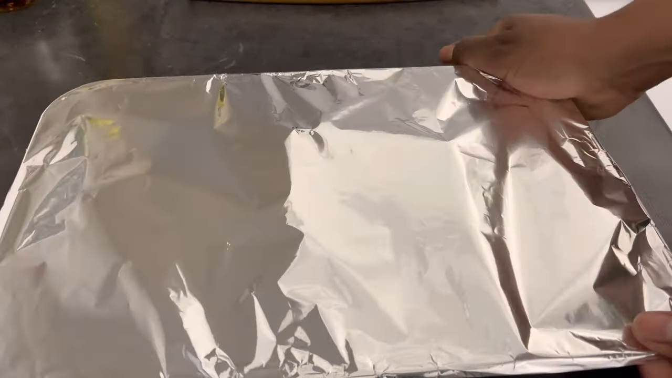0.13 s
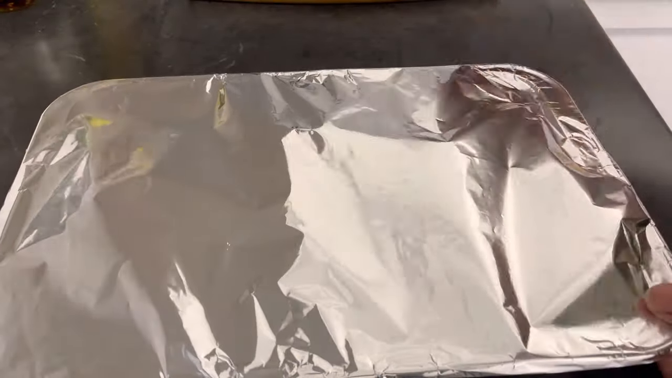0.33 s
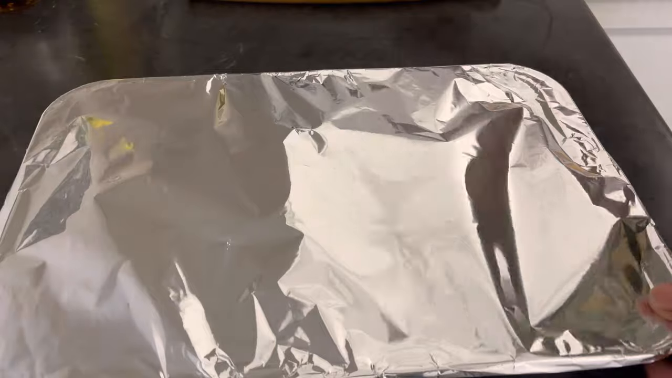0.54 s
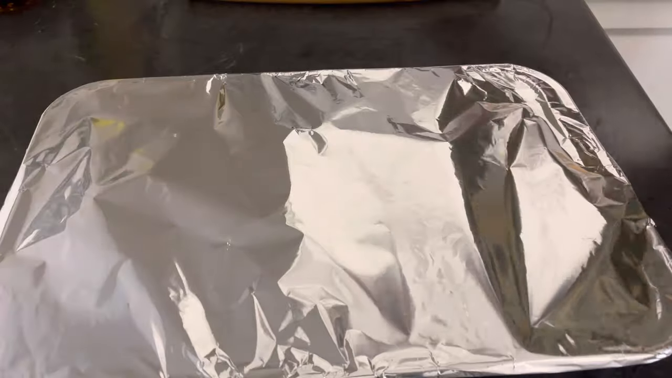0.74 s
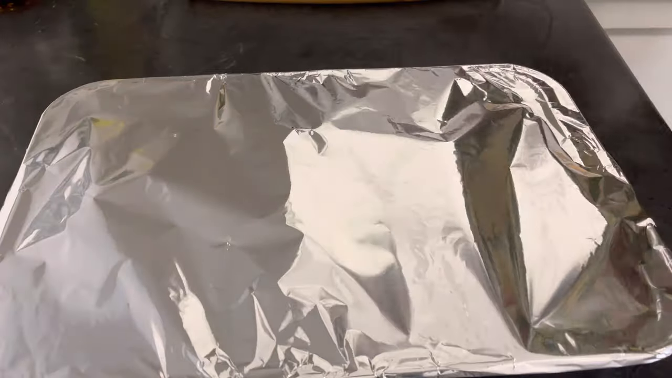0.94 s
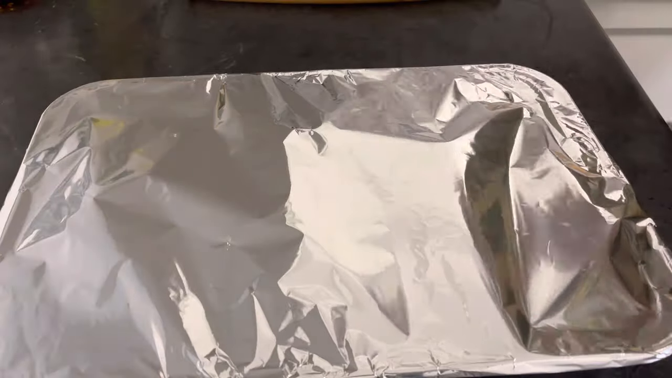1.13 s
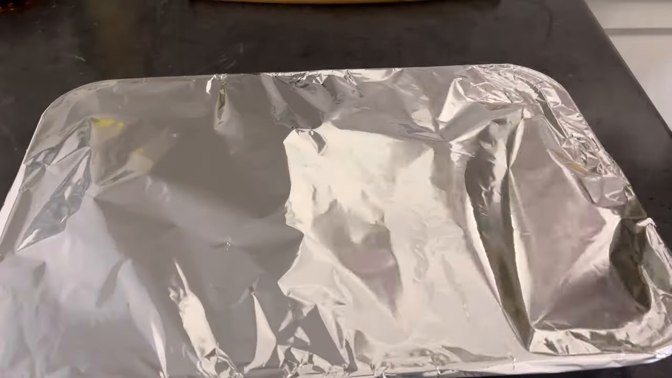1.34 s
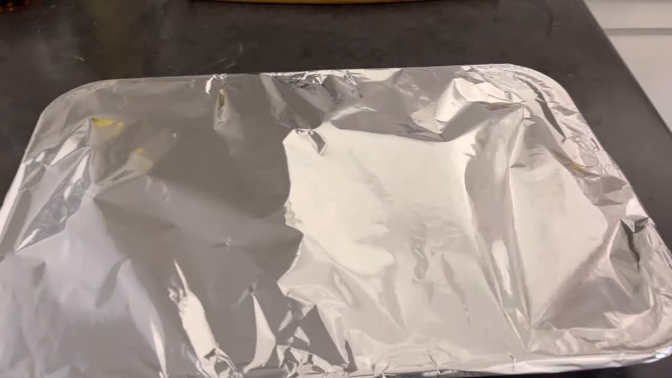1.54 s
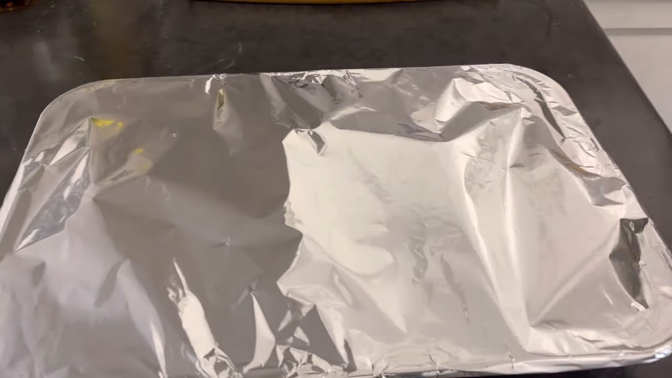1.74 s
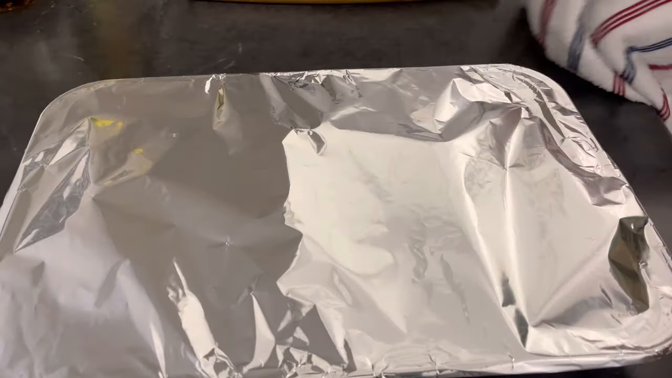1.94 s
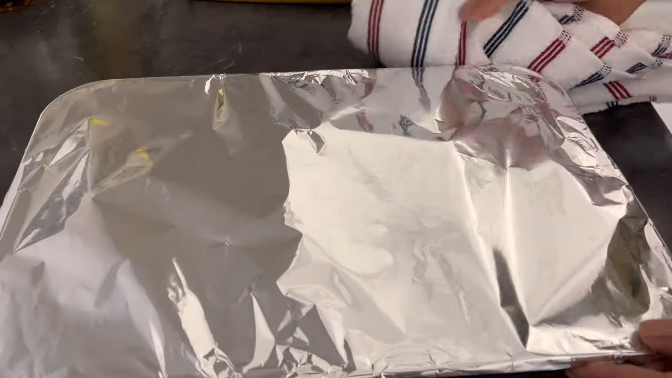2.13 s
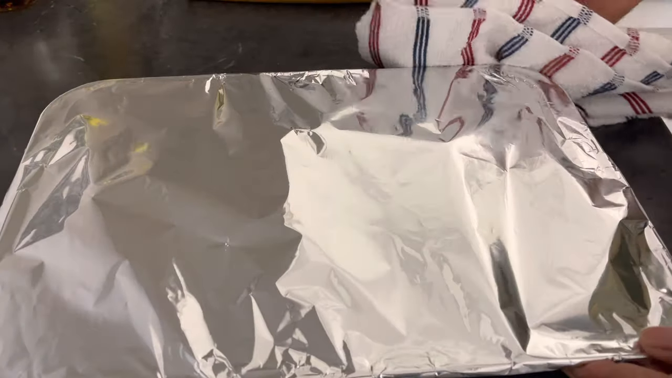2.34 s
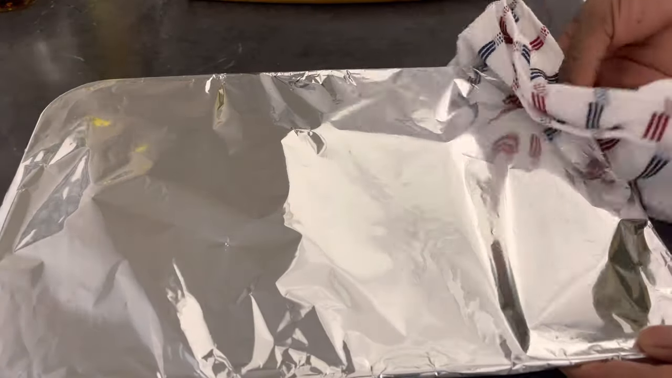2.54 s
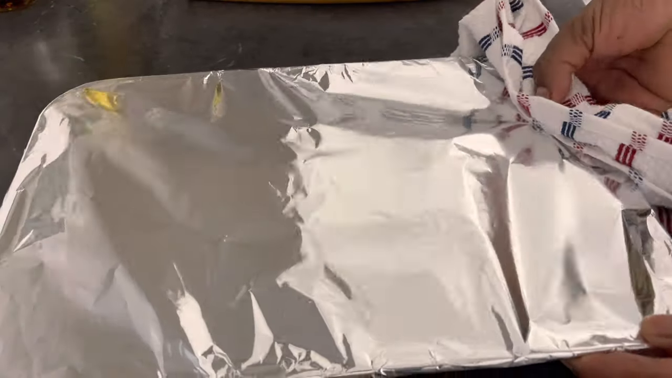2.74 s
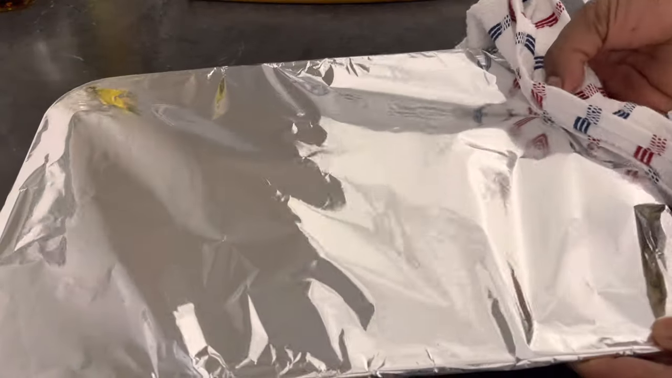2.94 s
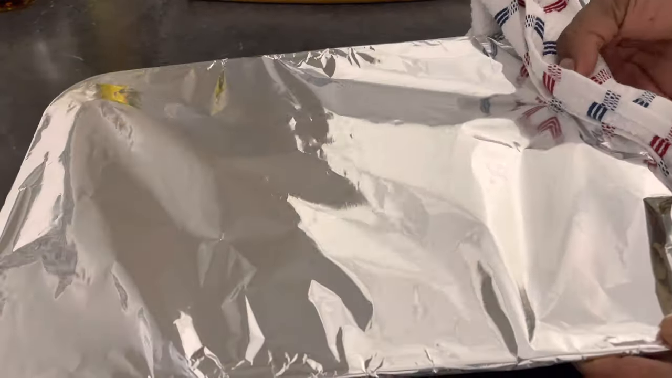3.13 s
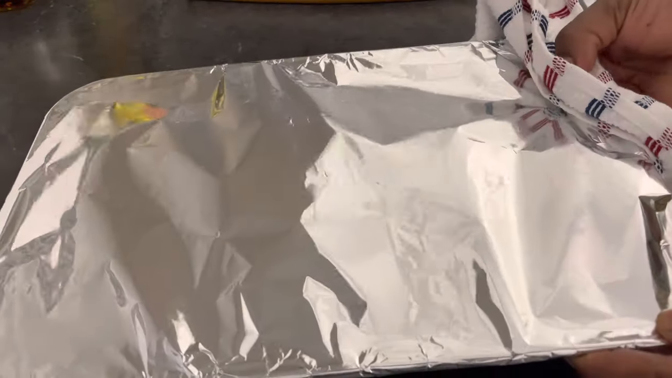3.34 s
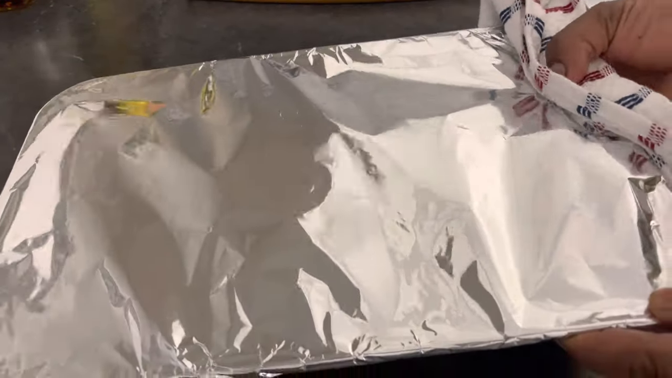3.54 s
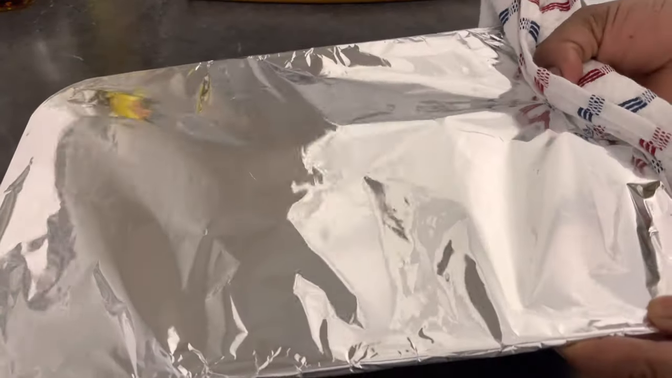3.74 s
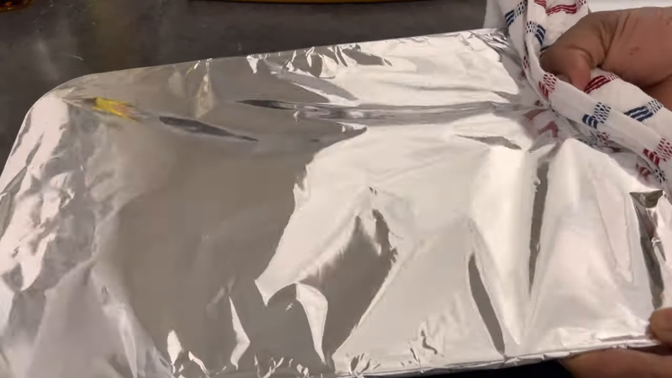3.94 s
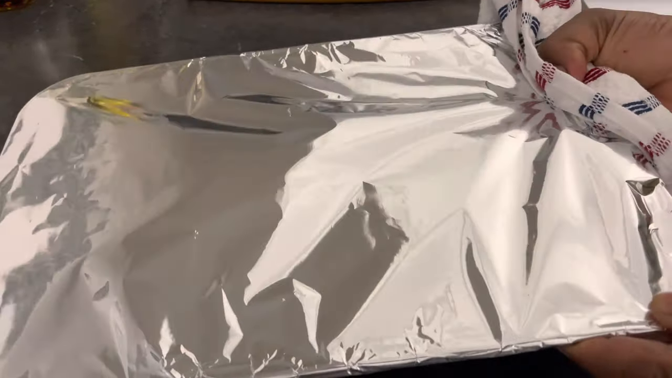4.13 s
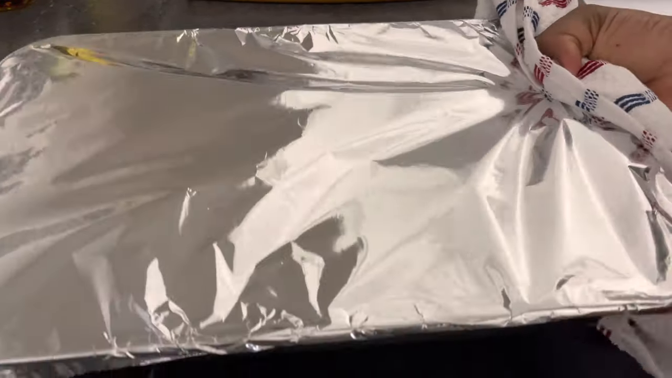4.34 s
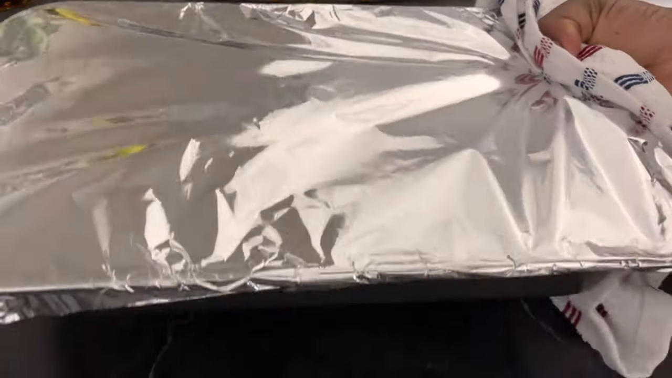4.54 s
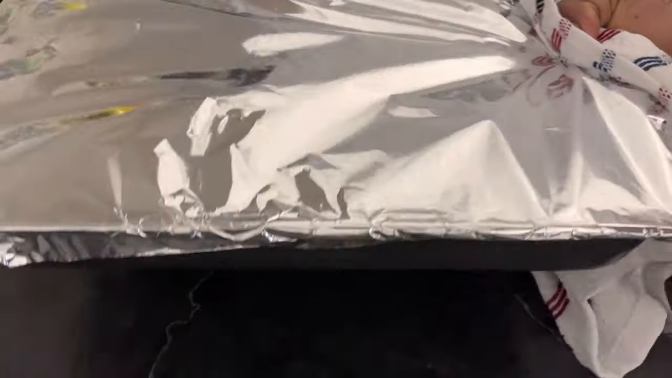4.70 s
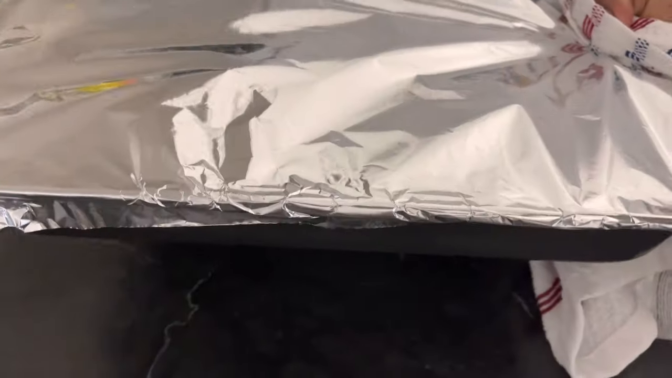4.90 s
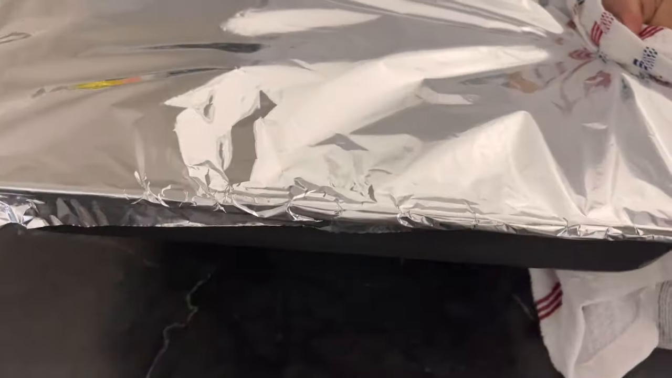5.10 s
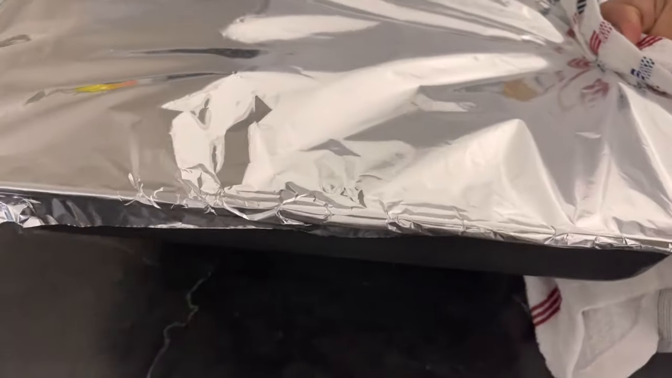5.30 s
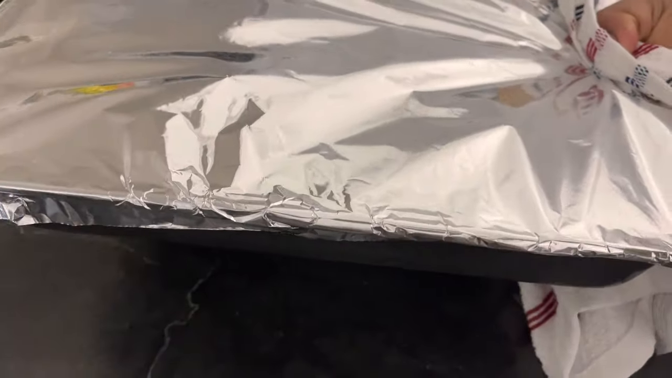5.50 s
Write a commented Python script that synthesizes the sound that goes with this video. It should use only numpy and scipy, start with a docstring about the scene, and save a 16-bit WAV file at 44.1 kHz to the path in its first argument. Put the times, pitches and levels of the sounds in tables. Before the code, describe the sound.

A close stereo sound of aluminium foil on a baking pan in a small kitchen with a short diffuse tail. From 0 to 0.6 s the foil is pressed in brief crisp crackles, with a soft low pan thud at the start and a stronger cluster of dull knocks around 0.35 s. The crackle then falls away; from about 0.9 to 2.1 s there is mostly soft low fridge hum and room air, a very faint high fizz near 1 s, and a tiny tick at 1.3 s. At 2.15 s crinkling resumes, swelling at 2.65 s. A sharp, loud snap and pan knock strike at 3.2 s. Dense, bright crumpling with brief pitched pops continues, strongest around 3.65-4.35 s, with a piercing snap near 3.93 s. After 4.5 s it thins to scattered small creases, with faint ticks at 5.15, 5.5 and 5.64 s over the hum.

```python
"""Foil crimped round a baking pan

In a kitchen, aluminium foil is pressed round the rim of a baking pan, close to a pair of microphone ports.
Random snaps, thousands a second, ring the sheet crisp and dull; creases open with a snap and crackle on.
Buckling facets ring as short pitched pops, and knocks on the worktop ring the modes of the pan.
A short diffuse tail follows; behind lie filtered-noise room air and fizz, a fridge hum and fuzzy tones."""
import sys
import numpy as np
from scipy import signal
from scipy.fft import rfft, irfft
from scipy.io import wavfile
from scipy.ndimage import uniform_filter1d

SR = 44100
rng = np.random.default_rng(int(sys.argv[2]) if len(sys.argv) > 2 else 0)


def wav_record(signal):
    """Record a signal, one row per channel, as 16-bit PCM in the file named by sys.argv[1]."""
    frames = np.transpose(np.atleast_2d(signal))
    bounded = np.clip(frames, -1, 1)
    # unit amplitude maps onto the largest positive 16-bit level
    quanta = np.round(bounded * 32767).astype(np.int16)
    wavfile.write(sys.argv[1], SR, quanta)


N = 249604
T = np.arange(N) / SR


def gain_of(db):
    """Decibels to amplitude."""
    return 10 ** (np.asarray(db) / 20)


def evened(x):
    """Scales to rms 1."""
    return x / np.sqrt(np.mean(x ** 2) + 1e-20)


def over_time(points):
    """Follows a (start_s, level_db) table in straight lines through the scene."""
    return np.interp(T, *np.transpose(points))


def read(points, hz):
    """Every column of a frequency table at the given frequencies, interpolated along log frequency."""
    f, *columns = np.transpose(points)
    return [np.interp(np.log(hz + 1), np.log(f + 1), c) for c in columns]


def coloured(x, points):
    """Filters by a (freq_hz, level_db) table, scaled so that white noise keeps its overall level."""
    gain = gain_of(read(points, np.fft.rfftfreq(x.shape[-1], 1 / SR))[0])
    return irfft(rfft(x) * evened(gain), x.shape[-1])


def drift(cutoff_hz):
    """Random wavering of rms 1: noise kept below the cutoff."""
    return evened(signal.lfilter(*signal.butter(2, cutoff_hz, fs=SR), rng.standard_normal(N)))


def rings(decays, count, size, colour_db=0.):
    """Dense noise rings that die at a speed set for each frequency, unevenly coloured; mean energy 1."""
    frames = dict(nperseg=64, noverlap=48)
    hz, t, z = signal.stft(rng.standard_normal((count, size)), SR, **frames)
    colour = colour_db * evened(uniform_filter1d(rng.standard_normal((count, len(hz), 1)), size=3, axis=1))
    colour -= 10 * np.log10(np.mean(gain_of(2 * colour), axis=0))  # together the rings stay flat
    t60 = read(decays, hz)[0][:, None]
    ring = signal.istft(z * gain_of(colour - 60 * t / t60), SR, **frames)[1]
    return evened(ring) / np.sqrt(ring.shape[1])


# Squeezes of the fingers: start_s (of most force), level_db (crisp crackle), swell_s, hold_s, fade_s
SQUEEZES = [(0.0, -29, .05, 0.0029, 0.071), (0.199, -34, 0.26, .005, 0.073),
            (0.334, -30.5, 0.02, 0.017, 0.061), (0.409, -40.5, .08, .02, 0.089),
            (0.568, -40.5, 0.09, 0.04, 0.047), (0.836, -66, .04, 0.046, 0.12),
            (2.167, -34, 0.056, .005, 0.15), (2.326, -38.5, 0.035, 0.38, 0.16),
            (2.648, -21, 0.022, 0.088, 0.13), (2.803, -33.5, 0.046, .05, 0.11),
            (3.008, -40.5, 0.095, 0.033, 0.18), (3.175, -27, 0.062, 0.0067, 0.025),
            (3.219, -21, 0.0097, 0.01, 0.14), (3.381, -27, 0.099, .01, 0.077),
            (3.435, -28, .05, 0.0075, 0.073), (3.502, -33, 0.072, 0.035, .1),
            (3.59, -32.5, 0.22, .005, 0.094), (3.659, -28, 0.037, 0.064, 0.086),
            (3.799, -23.5, 0.019, .002, 0.048), (3.876, -25, 0.11, 0.044, 0.048),
            (3.932, -19.5, 0.00485, 0.018, 0.06), (4.084, -26, 0.063, 0.0046, 0.1),
            (4.158, -25.5, 0.01, 0.11, 0.048), (4.311, -24, 0.045, 0.0038, 0.039),
            (4.348, -31.5, .005, 0.0056, 0.19), (4.554, -47, 0.063, .005, 0.12),
            (4.617, -42, 0.029, .005, 0.13), (5.158, -56.5, .035, .005, 0.14),
            (5.637, -63.5, .02, .002, .02)]
# The sheet ticking on between squeezes: start_s, level_db
SETTLING_TICKS = [(0.6, -51), (0.85, -70.5), (1.2, -84.5), (1.95, -67), (2.07, -83), (2.1, -56), (2.2, -70),
                  (4.5, -57.5), (4.8, -62), (5.05, -91.5), (5.66, -94)]
SWING_DB = 20  # change of a squeeze over one swell or fade time
RATTLE_DB, RATTLE_SLOPE = -38, 0.8  # dull rattle at a crackle of -30 dB; dB gained per dB of crackle
CLUMP_DB, CALM_DB = 3.0, -71  # scale of the clumping; crackle level below which there is none


def squeezes():
    """Power of the crisp and dull crackle: force sets both, the rattle growing less steeply than the crackle."""
    crisp = gain_of(2 * over_time(SETTLING_TICKS))
    for start_s, level_db, swell_s, hold_s, fade_s in SQUEEZES:
        before = np.clip((start_s - T) / swell_s, 0, 5)
        after = np.clip((T - start_s - hold_s) / fade_s, 0, 5)
        crisp = crisp + gain_of(2 * (level_db - SWING_DB * (before + after)))
    crisp_db = 10 * np.log10(crisp)
    shared = drift(50.4)
    own = np.array([drift(100.0), drift(37.0)])
    clumping = CLUMP_DB * np.clip((crisp_db - CALM_DB) / 20, 0, 1)  # full from 20 dB above calm
    dull_db = RATTLE_DB + RATTLE_SLOPE * (crisp_db + 30)
    return gain_of(2 * (clumping * (0.79 * shared + 0.45 * own) + [crisp_db, dull_db]))


# Single large creases: start_s, level_db (crisp burst), rattle_db (dull burst relative to it)
LARGE_CREASES = [(0.01, -28.5, -5), (0.1349, -37, -2), (0.1748, -27.5, -4), (0.3016, -33.5, -1.5),
                 (0.3334, -24, -17), (0.35, -26, -13), (0.4307, -28, -6.5), (0.532, -35.5, -5),
                 (0.5747, -29, -5), (1.309, -53, -19), (2.159, -21, -8), (2.302, -26.5, -9),
                 (2.336, -22, -14), (2.392, -42, 9), (2.41, -40, 9.5), (2.4495, -26, -6.5),
                 (2.519, -26.5, -10), (2.6, -24.5, -8), (2.6444, -16, -5.5), (2.6575, -15.5, -11),
                 (2.715, -18, -8), (2.729, -17, -13.5), (2.9076, -33, -6), (2.9986, -17, -11),
                 (3.079, -24.5, -13), (3.107, -24, -12), (3.218, -8.5, -12), (3.5518, -26, -4),
                 (3.588, -23.5, -14), (3.6527, -15, -12), (3.6718, -19, -14), (3.714, -21, -11.5),
                 (3.7846, -13, -14), (3.848, -21, -10), (3.8788, -21, -13.5), (3.905, -13, -15),
                 (3.9283, -12.5, -21), (4.037, -19.5, -11.5), (4.067, -19.5, -16), (4.16, -16.5, -25),
                 (4.2026, -15, -17.5), (4.3145, -18.5, -16), (4.3545, -17, -13.5), (4.5326, -26.5, -10),
                 (4.541, -28, -6), (4.611, -31, -5.5), (4.69, -40, -3), (4.7814, -30.5, -9),
                 (4.886, -47.5, -12), (5.1318, -43.5, -4.5), (5.147, -33, -7.5), (5.2487, -53, 6.5),
                 (5.3125, -65.5, 14.5), (5.468, -60, 9.5), (5.493, -56.5, 7), (5.6362, -42, 9)]
FIRST_SNAP_DB = 11  # the snap that opens a crease, over the burst that follows
BURST_T60_S, BURST_S_PER_DB = 0.04, 0.0029  # t60 after a crease of -30 dB; longer for larger creases


def creases(power):
    """Adds a dying burst of small snaps to the power at each crease; returns the opening snaps."""
    first = np.zeros((2, N))
    for start_s, level_db, rattle_db in LARGE_CREASES:
        start = round(start_s * SR)
        level = gain_of(level_db + np.array([0, rattle_db]))
        t60 = max(BURST_T60_S + BURST_S_PER_DB * (level_db + 30), .01)
        burst = gain_of(-2 * 60 * T[:8192] / t60)
        part = power[:, start:][:, :len(burst)]  # a view, so power itself grows
        part += level[:, None] ** 2 * burst[:part.shape[1]]
        first[:, start] = level * gain_of(FIRST_SNAP_DB)
    return first


# Tone of the crisp crackle: freq_hz, level_db (per Hz)
CRISP_TONE = [(2500, -27), (5000, -9), (7000, -10), (8600, -5.5), (10300, 3), (11700, 2.5), (12500, -6),
              (13500, -33), (15600, -32.5), (16000, -57.5)]
# Tone of the duller sheet rattle: freq_hz, level_db (per Hz)
RATTLE_TONE = [(250, -20.5), (600, -13), (1300, -4.5), (2000, 0.5), (2700, 2.5), (3500, 0), (5000, -5),
               (8000, -14), (13000, -55)]
# Long ring of the foil sheet: freq_hz, t60_s
SHEET_RING = [(500, 0.22), (2000, 0.075), (6000, 0.12), (12000, 0.017)]
# Short ring of a snap: freq_hz, t60_s
SNAP_RING = [(1000, 0.0087), (10000, 0.009)]
SNAPS_PER_S = 2500  # mean rate, in the crisp and in the dull part alike
SIZE_SPREAD_DB = 4.0  # mean of the exponential spread of snap sizes, before its cap
STAY_S, STAY_SHARE = .02, .5  # mean time the fingers work one patch; share of snaps tied to it
SHORT_SHARE = .6  # short ring of each small snap, beside its long one
PATCH_COLOUR_DB = 4.0  # spread of tone colour between patches


def foil(count=14):
    """Each snap, most small and a few large, rings one of several patches of the sheet."""
    out = np.zeros((2, N))
    power = squeezes()
    openings = creases(power)
    for part_power, first, tone in zip(power, openings, (CRISP_TONE, RATTLE_TONE)):
        struck = rng.random(N) < SNAPS_PER_S / SR
        size = struck * gain_of(SIZE_SPREAD_DB * np.minimum(rng.exponential(1, N), 3.3))
        snaps = evened(size * rng.choice([-1., 1.], N))
        snaps = snaps * np.sqrt(part_power / (1 + SHORT_SHARE ** 2))
        moves = np.cumsum(rng.random(N) < 1 / (STAY_S * SR))
        worked = rng.integers(0, count, N)[moves]
        chosen = np.where(rng.random(N) < STAY_SHARE, worked, rng.integers(0, count, N))
        patch = chosen == np.arange(count)[:, None]
        for side in range(2):
            long = rings(SHEET_RING, count, 4096, PATCH_COLOUR_DB)
            short = rings(SNAP_RING, count, 4096, PATCH_COLOUR_DB)
            rung = signal.oaconvolve(snaps * patch, long, axes=1)
            rung += signal.oaconvolve((first + SHORT_SHARE * snaps) * patch, short, axes=1)
            out[side] += coloured(rung.sum(0)[:N], tone)
    return out


# Flat facets of the sheet that buckle: start_s, level_db, pitch_hz (middle of a close pair), t60_s
FACETS = [(.134, -28, 2060, 0.046), (.136, -29.5, 2740, .07), (.336, -32, 2770, .08), (.352, -28, 2650, .1),
          (.578, -37, 3000, .07), (.955, -68, 4150, .4), (1.385, -68, 3970, .25),
          (2.302, -15.5, 9300, .012), (2.337, -24, 11200, .03), (2.45, -26, 11400, 0.037),
          (2.65, -23, 2080, .12), (3.655, -22, 2660, 0.14), (3.788, -21, 4700, .08),
          (3.9293, -8, 11400, .02), (4.068, -18, 9100, .03), (4.355, -29.5, 2400, .08),
          (4.533, -42, 2000, .06), (4.605, -39, 2000, .06), (4.764, -42, 1494, .025),
          (4.768, -43, 1050, .03), (4.783, -39, 2190, .05), (4.884, -50, 2620, .06),
          (5.488, -51, 2600, .03), (5.496, -47, 900, .04)]
MAX_DETUNE, POP_RISE_S = 0.013, .0006  # farthest each of the pair lies from the pitch, as a share of it


def pops():
    """Each buckling facet rings briefly as a close pair of modes, a quarter cycle apart in the two versions."""
    t = T[:8192]
    out = np.zeros((2, N + 8192))
    for start_s, level_db, pitch_hz, t60_s in FACETS:
        detune = MAX_DETUNE * rng.uniform(0.54, 1)
        pair = sum(np.exp(2j * np.pi * pitch_hz * (1 + k * detune) * t) for k in (-1, 1)) / 2
        ring = gain_of(level_db - 60 * t / t60_s) * np.minimum(t / POP_RISE_S, 1) * pair
        out[:, round(start_s * SR):][:, :len(t)] += [ring.imag, ring.real]
    return out[:, :N]


# Pan against the worktop: start_s, level_db, contact_s
PAN_KNOCKS = [(.0, -10, 0.0057), (.308, -18, 0.0045), (.338, -11.5, 0.0038), (.357, -2, .0105),
              (3.2121, 4, 0.00084), (3.2295, 0, .0095)]
# Modes of the pan: pitch_hz, level_db, t60_s
PAN_MODES = [(64, -36.5, 0.074), (104.5, -30, 0.17), (181.2, -13, 0.027), (261, -36, 0.23),
             (325, -13, 0.019), (399, -27, 0.12), (788, -25.5, 0.027), (1080, -31, 0.067)]
LAG_CYCLES = 1.494  # bending waves carry low modes more slowly: each starts this many cycles late


def pan():
    """A half-sine push of the given contact time rings the modes of the pan."""
    t = T[:SR // 2]
    out = np.zeros(N + SR)
    ring = 0
    for pitch_hz, level_db, t60_s in PAN_MODES:
        since = np.maximum(t - LAG_CYCLES / pitch_hz, 0)
        ring = ring + gain_of(level_db - 60 * since / t60_s) * np.sin(2 * np.pi * pitch_hz * since)
    for start_s, level_db, contact_s in PAN_KNOCKS:
        push = np.sin(np.pi * np.clip(t[:400] / contact_s, 0, 1))  # cut off after 400 samples
        blow = np.convolve(ring, push / push.sum())
        out[round(start_s * SR):][:len(blow)] += gain_of(level_db) * blow
    return out[:N]


KITCHEN_DB, KITCHEN_T60_S = -12.5, 0.35  # tail level; decay at 100 Hz and below


def kitchen(x):
    """Reflections blend into a short diffuse tail, another for each side, dying sooner in the treble."""
    tail = rings([(100, KITCHEN_T60_S), (10000, 0.31 * KITCHEN_T60_S)], count=2, size=16384)
    tail = np.pad(tail, ((0, 0), (300, 0)))  # samples before the tail begins
    return x + gain_of(KITCHEN_DB) * signal.fftconvolve(x, tail, axes=1)[:, :N]


# Fridge compressor orders: multiple (of the shaft speed), level_db (within the background mix)
HUM_ORDERS = [(3, -13), (4, -10.5), (5, -13.5), (6, 0), (7, -9.5), (8, -24.5), (9, -9), (11, -17)]
SHAFT_HZ = 42.33


def fridge_hum():
    """Orders of a compressor shaft whose speed drifts a little, each wavering in level by itself."""
    turns = np.cumsum(SHAFT_HZ * (1 + 0.0009 * drift(1.74))) / SR
    hum = np.zeros(N)
    for multiple, level_db in HUM_ORDERS:
        level = gain_of(level_db + 2.03 * drift(4.7))
        hum += level * np.sin(2 * np.pi * (multiple * turns + rng.random()))
    return hum


# Fuzzy tones: pitch_hz, width_hz (cutoff of the wavering), level_db (within the background mix)
FUZZY_TONES = [(58.5, 8, -9.5), (3480, 40, -31), (5094, 20, -39)]
STEADY = 0.98  # steady part of each tone, beside wavering parts of rms 1


def fuzzy_tones():
    """Each tone is a steady carrier blurred by random wavering of strength and phase."""
    out = np.zeros(N)
    for pitch_hz, width_hz, level_db in FUZZY_TONES:
        wobble = STEADY + drift(width_hz) + 1j * drift(width_hz)
        out += gain_of(level_db) * (wobble * np.exp(2j * np.pi * pitch_hz * T)).real
    return out


# Faint high fizz, clearest while the hands rest: start_s, level_db
FIZZ_LEVEL = [(0.66, -61.5), (1.026, -55.5), (1.13, -94), (1.19, -64), (1.31, -83), (1.4, -96), (2.1, -75)]
# Tone of the fizz: freq_hz, level_db (per Hz)
FIZZ_TONE = [(7000, -33), (9000, -14.5), (10600, 1.5), (11900, 5), (12400, -17), (12800, -54.5)]
FIZZ_REST_DB = -97.5  # before and after the table


def fizz():
    """Filtered noise, separate on each side, rising and falling in level."""
    level_db = np.interp(T, *np.transpose(FIZZ_LEVEL), FIZZ_REST_DB, FIZZ_REST_DB)
    return gain_of(level_db) * coloured(rng.standard_normal((2, N)), FIZZ_TONE)


# Tone of the low room air: freq_hz, level_db (per Hz)
AIR_TONE = [(15, -57), (25, -27.5), (48, 1.5), (88, -6), (123, 0), (187, -12.5), (257, -2.5), (316, -6),
            (380, -10), (593, -11.5), (3420, -34.5), (7700, -45), (10800, -46), (13000, -66.5)]
# Fader of air, hum and fuzzy tones together: start_s, level_db (before a fixed mix gain)
BACKGROUND_LEVEL = [(0.0, -46), (0.71, -50.5), (1.17, -49), (1.6, -52.5), (1.95, -49), (3.3, -46),
                    (4.22, -45), (4.52, -46.5), (5.66, -45.5)]


def background():
    """Low filtered-noise room air, fridge hum and fuzzy tones move in level together; the fizz moves alone."""
    air = coloured(rng.standard_normal((2, N)), AIR_TONE)
    mix = gain_of(-4.0) * (air + fuzzy_tones() + fridge_hum())
    return gain_of(over_time(BACKGROUND_LEVEL)) * mix + fizz()


# The two microphone ports: freq_hz, likeness (left to right), balance_db (left minus right),
# lead_rad (how far the right leads)
PORT_PAIR = [(60, .94, 3, 0), (150, .9, 4.5, 0), (255, .65, 2.5, -1.3), (295, .6, 3, -3.5),
             (350, .12, 2, 0), (800, .12, 3.5, 0), (2700, 0, 0, 0), (5300, .05, 8, 0), (7500, .25, 3, 0),
             (8500, .45, 1, 0), (8800, .85, 0, .1), (9800, .96, 0, 2.7), (10150, .995, 0, 3.14),
             (10400, .97, 0, 3.45), (11000, .88, 0, 4.7), (11800, .96, 0, 6), (12400, .92, 0, 6.35),
             (13500, .5, 0, 6.28)]


def ports(x):
    """Blends two versions of a sound into left and right, with likeness, level and phase set by frequency."""
    same, balance_db, lead_rad = read(PORT_PAIR, np.fft.rfftfreq(N, 1 / SR))
    same = np.clip(same, 0, 1)
    a, b = rfft(x)
    right = same * np.exp(1j * lead_rad) * a + np.sqrt(1 - same ** 2) * b
    return irfft(np.array([a * gain_of(balance_db / 2), right * gain_of(-balance_db / 2)]), N)


def scene():
    """Foil and pan close by in the kitchen, over the background, heard at the two ports."""
    return ports(kitchen(foil() + pops() + pan()) + background())


LOW_CUT_HZ, EDGE_HZ = 39, 16500


def record(dry):
    """The microphone's low cut, a preamp that rounds off the loudest peaks, then the band limit."""
    cut = signal.sosfilt(signal.butter(3, LOW_CUT_HZ, "high", fs=SR, output="sos"), dry)
    rounded = np.tanh(cut)
    band_limit = signal.firwin(511, EDGE_HZ, window=("kaiser", 9), fs=SR)
    return signal.oaconvolve(rounded, band_limit[None], "same")


dry = scene()
out = record(dry)
wav_record(out)
```